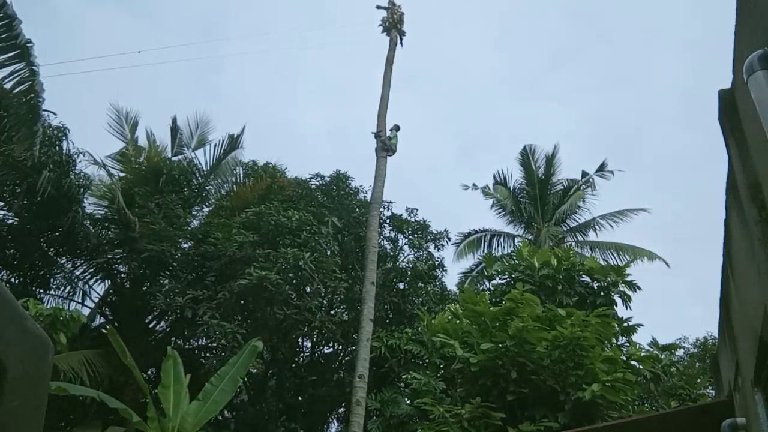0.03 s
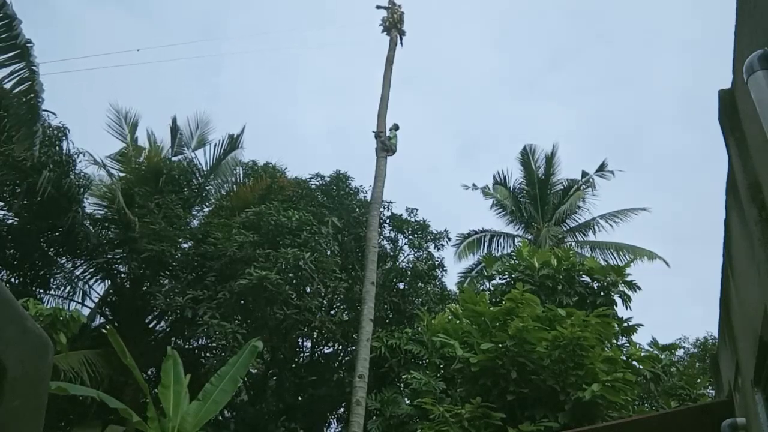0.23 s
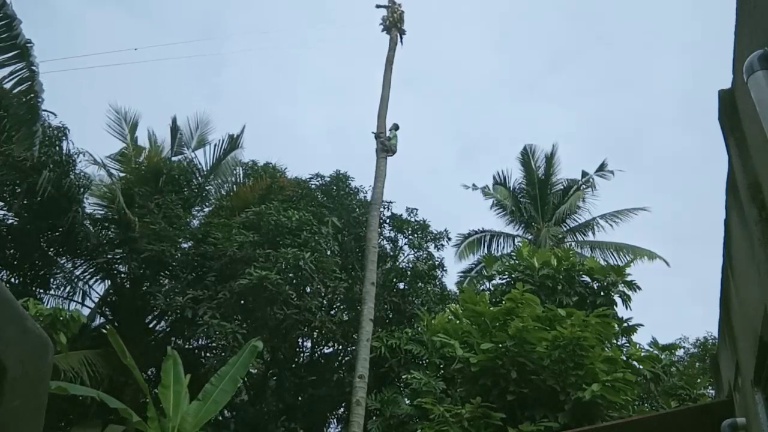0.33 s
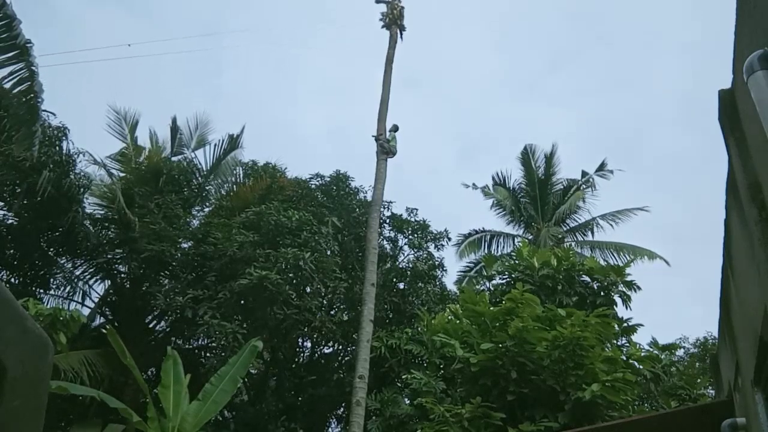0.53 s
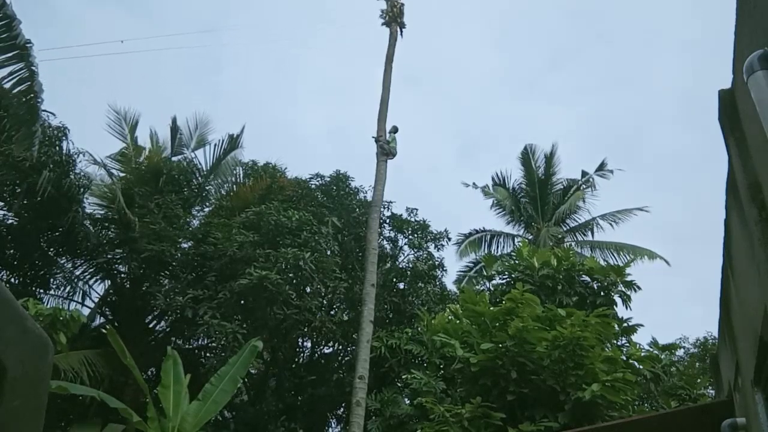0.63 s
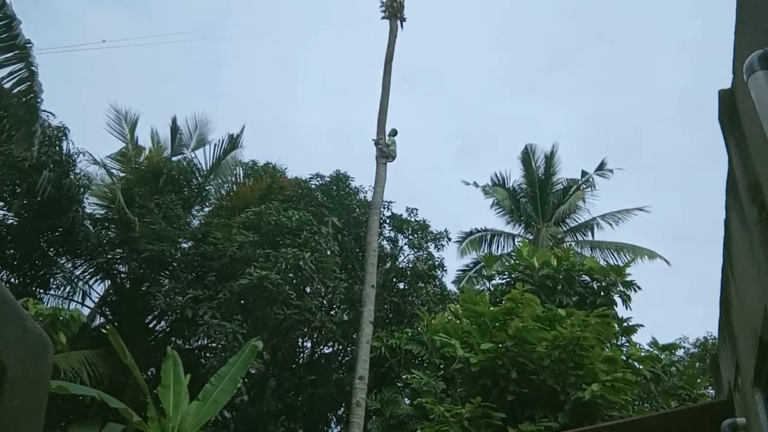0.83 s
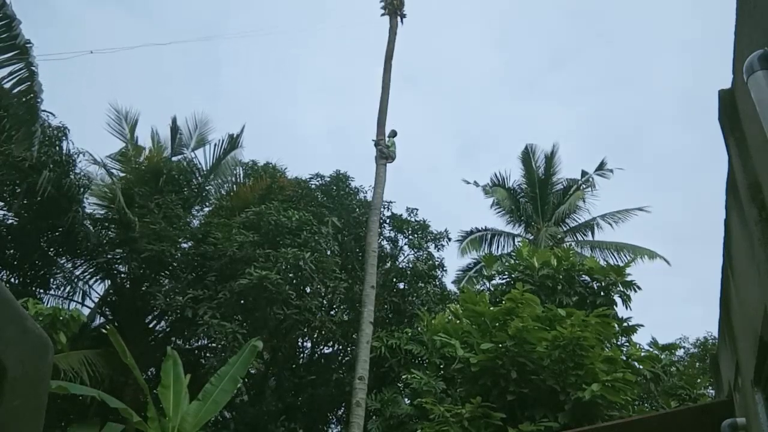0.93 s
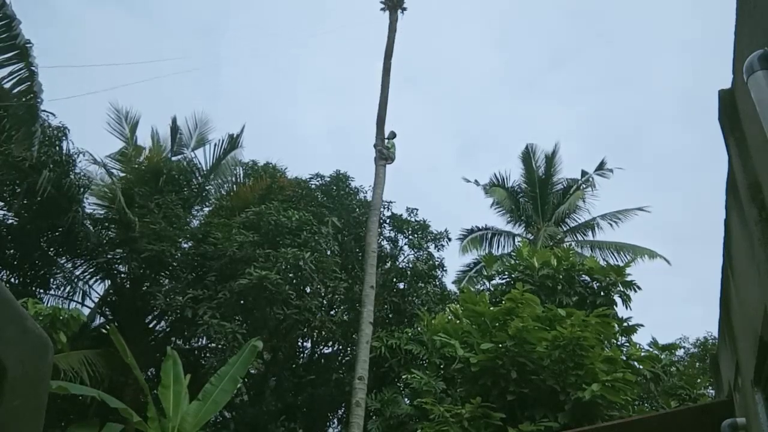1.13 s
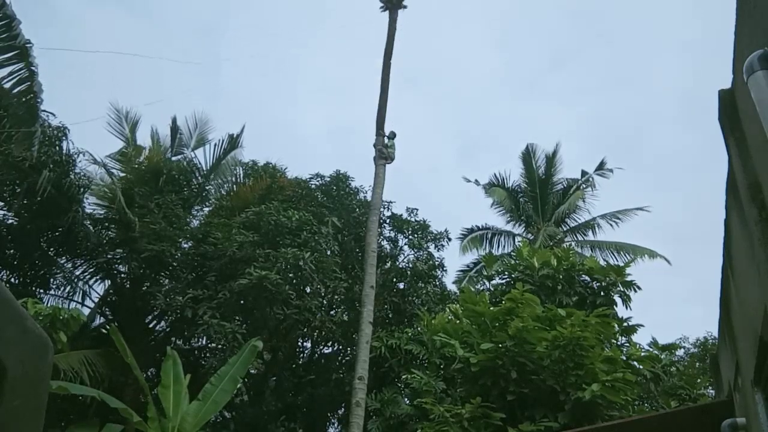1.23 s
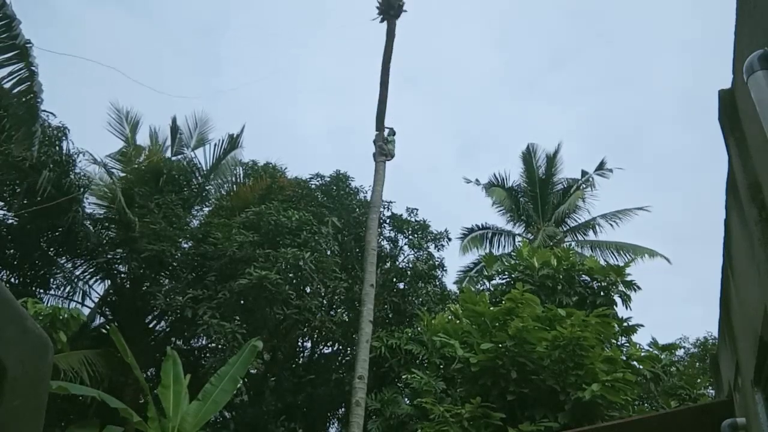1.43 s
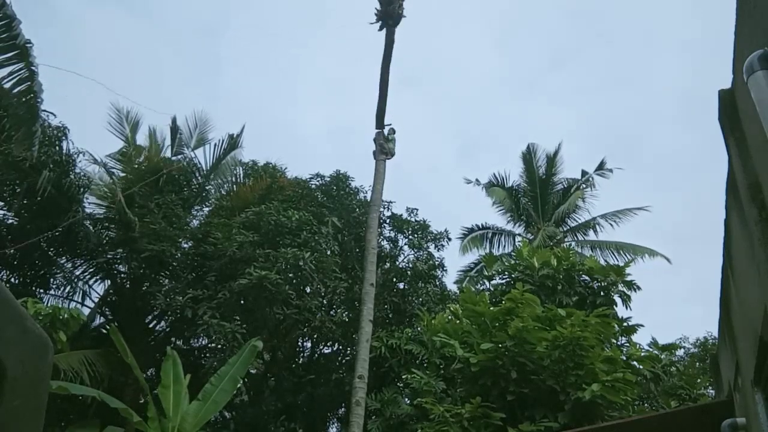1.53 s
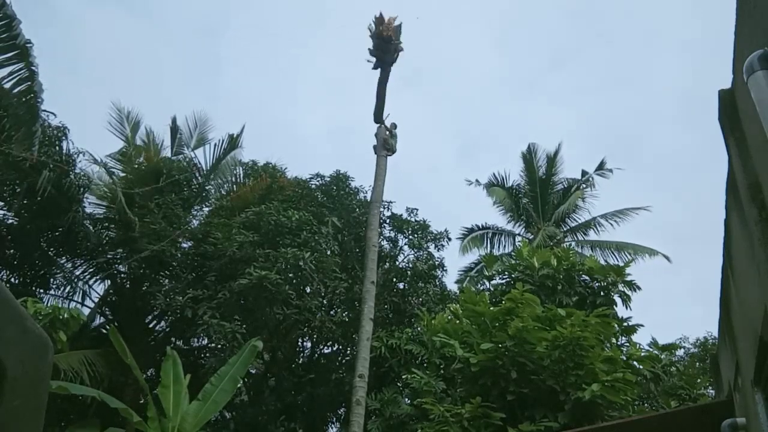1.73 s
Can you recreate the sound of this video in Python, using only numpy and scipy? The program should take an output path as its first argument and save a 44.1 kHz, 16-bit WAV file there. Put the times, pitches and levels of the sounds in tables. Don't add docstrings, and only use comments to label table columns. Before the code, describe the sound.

A palm tree top snaps with a sharp wooden crack, then splinters and rustling fronds trail off

```python
import sys
import numpy as np
from scipy import signal
from scipy.fft import rfft, irfft
from scipy.io import wavfile
from scipy.ndimage import uniform_filter1d

SR = 44100
rng = np.random.default_rng(int(sys.argv[2]) if len(sys.argv) > 2 else 0)


def generate_wav(sig):
    pcm = np.round(np.clip(np.atleast_2d(sig).T, -1, 1) * 32767).astype(np.int16)
    wavfile.write(sys.argv[1], SR, pcm)


def voltage_ratio(decibels):
    exponent = np.asarray(decibels, float) / 20
    return 10 ** exponent


N = 79380
T = np.arange(N) / SR


def unit(x):
    return x / np.sqrt(np.mean(x ** 2))


def curve(table, order=1):
    return np.interp(T, np.array(table)[:, 0], np.array(table)[:, order])


def colour(x, points):
    log_hz = np.log(np.maximum(np.arange(N // 2 + 1) * SR / N, 1))
    p = np.array(points)
    at = np.log(p[:, 0])
    outside = np.maximum(at[0] - log_hz, 0) + np.maximum(log_hz - at[-1], 0)
    gain = voltage_ratio(np.interp(log_hz, at, p[:, 1]) - 37 * outside)
    return unit(irfft(rfft(x) * gain, N))


def ring(x, peaks, order=1):
    out = 0
    for k, (hz, width, db) in enumerate(peaks):
        y = x
        for _ in range(order):
            y = signal.lfilter(*signal.iirpeak(hz, hz / width, SR), y)
        out = out + (-1) ** k * voltage_ratio(db) * y
    return out


def walk(rate):
    k = int(SR / rate)
    held = np.repeat(rng.standard_normal(N // k + 1), k)
    return 1.5 * uniform_filter1d(uniform_filter1d(held, k), k)[:N]


def burst(start, length):
    rise_s = 0.0003
    t = np.maximum(T - start, 0)
    return (1 - np.exp(-t / rise_s)) * np.exp(-t / max(length, rise_s))


def bursts(events):
    return sum(voltage_ratio(db) * burst(s, n) for s, db, n in events)


def grains(rate, spread_db):
    bits = (rng.random(N) < rate / SR) * voltage_ratio(spread_db * rng.exponential(size=N))
    return unit(rng.standard_normal(N) * (1.8 + signal.lfilter([1], [1, -.95], bits)))


def modes(events):
    waver_rad, waver_db, waver_hz = 0.7, 1.2, 500
    out = 0
    for s, db, hz, n in events:
        waver = min(hz / waver_hz, 1)
        pace = min(hz / 2, waver_hz)
        tone = np.sin(2 * np.pi * hz * (T - s) + waver_rad * waver * walk(pace))
        swell = np.clip((T - s) * hz, 0, 1)
        out = out + voltage_ratio(db + waver_db * waver * walk(pace)) * tone * burst(s, n) * swell
    return out


def cracks():
    # (time [s], peak [dB], treble share [dB], length [s])
    breaks = [(.2100, -1.5, 2, 0.0022), (0.2119, -2, -9, 0.0017), (0.225, -10.5, -4, 0.0017),
              (0.23, -18, -12, 0.0017), (0.244, -20, -9, 0.0034), (0.245, -16, -10, 0.0018),
              (0.347, -14.5, 10, 0.002), (0.349, -14, -14, 0.0086), (0.3567, -19, 13.5, 0.0026),
              (0.362, -22, -20, 0.0051), (0.37, -23, -19, 0.0031), (0.414, -22.5, 4, 0.0042),
              (0.419, -18, 2, 0.0041), (0.439, -22.5, -4, 0.0039), (0.469, -32, -16, 0.0031),
              (0.4933, -21.5, 0.5, 0.0073), (0.519, -28.5, -12, 0.0086), (0.588, -32.5, 4.5, 0.0066),
              (0.795, -33.5, 2.5, 0.007), (1.008, -37, -16, 0.008), (1.235, -41, -15, .004),
              (1.27, -37, -20, 0.0045), (1.402, -33.5, -14.5, 0.00296)]
    # (time [s], peak [dB], length [s])
    ribs = [(0.306, -27, 0.0033), (0.391, -35, 0.0023), (0.44, -28, .003), (0.47, -23, 0.001),
            (0.519, -29, 0.005), (.545, -26, .002), (0.574, -32, .002), (0.61, -30, .002),
            (0.629, -24.5, .002), (0.637, -24.5, .002), (0.674, -30, 0.0025), (0.711, -34, .002),
            (0.757, -27, .002), (0.801, -37, 0.0022), (0.819, -29, .003), (.859, -31, 0.0022),
            (.9039, -29, 0.0022), (0.959, -32, 0.0034), (0.981, -33, .002), (1.007, -46, 0.0016)]
    # (frequency [Hz], width [Hz], level [dB])
    wood = [(827, 270, -5.5), (1240, 314, 1), (2130, 660, -6.5), (2750, 640, -11.5), (3380, 1400, -11)]
    # (frequency [Hz], width [Hz], level [dB])
    snap_peaks = [(6350, 1260, -3.5), (7740, 520, 0.5), (8900, 490, -12.5), (3700, 730, -14),
                  (13400, 2600, -42)]
    body_noise, snap_noise = np.sign(rng.standard_normal((2, N)))
    body = bursts([(s, db, n) for s, db, _, n in breaks])
    snap = bursts([(s, db + treble, 0.5 * n) for s, db, treble, n in breaks]) + bursts(ribs)
    body_sound = voltage_ratio(12) * ring(body_noise * body, wood, order=2)
    return body_sound + voltage_ratio(10.5) * ring(snap_noise * snap, snap_peaks, order=2)


def thuds():
    # (time [s], peak [dB], pitch [Hz], length [s])
    blows = [(.201, -21, 484, 0.0089), (0.203, -23, 1064, 0.017), (0.205, -26, 2020, 0.0087),
             (.2105, -7, 2714, 0.0038), (.2085, -13, 429, 0.0092), (.222, -15, 497.5, 0.013),
             (0.213, -21, 735.3, 0.021), (.211, -24, 270, 0.0088), (.212, -18, 362.6, 0.012),
             (0.213, -24.5, 132, 0.016), (.215, -18.5, 88, 0.013), (.228, -21.5, 191.6, 0.022),
             (.243, -23.5, 94.6, 0.036), (.244, -21, 410.6, 0.0125), (0.348, -14.5, 2130, 0.0045),
             (0.37, -24, 201, 0.0097), (0.417, -16, 2130, 0.0036), (0.828, -32.5, 540, 0.0066),
             (0.829, -34.5, 772, 0.0061), (1.195, -39, 716, 0.005), (1.207, -30, 1010, 0.0026),
             (1.216, -38, 740.4, 0.0092), (1.523, -37.5, 407, 0.0101), (1.748, -36.5, 481, 0.011)]
    return modes(blows)


def more_modes():
    # (time [s], peak [dB], pitch [Hz], length [s])
    pings = [(.2132, -1.5, 1173, 0.0031), (0.2136, -14, 2150, .002), (0.2213, -22, 1350, 0.0018),
             (.2235, -11.5, 1187, 0.0042), (.2265, -14, 2220, 0.0038), (0.2367, -16, 990, 0.0038),
             (0.251, -11, 851, 0.0017), (.2515, -15, 1440, 0.0023), (0.268, -26.5, 3280, .003),
             (.3508, -16, 1190, 0.0048), (0.3569, -16, 1300, 0.0016), (0.3637, -24, 2260, 0.0047),
             (0.42, -20, 1303, 0.0027), (.436, -28, 2230, 0.0055), (.472, -27, 2080, 0.0049),
             (0.492, -26, 3200, 0.0028), (0.521, -28, 1330, 0.013), (.588, -28, 1193, 0.0054),
             (0.608, -25.5, 1025, 0.0039), (0.642, -36, 2770, 0.0033), (.796, -33.5, 2840, .006),
             (0.956, -41, 3140, 0.036), (1.017, -38.5, 3280, 0.015), (1.018, -29.5, 1310, 0.0036),
             (1.4447, -23.5, 2754, 0.0043), (1.4455, -25.5, 1357, 0.0075), (1.45, -28, 855, .004)]
    return modes(pings)


def late_knock():
    # (time [s], peak [dB], length [s])
    strikes = [
        (1.4443, -20, 0.0032),
        (1.4481, -21.5, 0.0032),
        (1.4508, -27.5, 0.0045),
        (1.461, -32, .003),
        (1.467, -32, 0.0045),
        (1.489, -41, 0.0045),
        (1.51, -39, 0.0042),
        (1.526, -40, .008),
    ]
    # (frequency [Hz], width [Hz], level [dB])
    piece = [(815, 290, 0), (1274, 500, -0.5), (2150, 390, 0.5), (2740, 530, 2.5), (7400, 1300, -11.5),
             (14200, 3300, -33)]
    noise = np.sign(rng.standard_normal(N))
    return voltage_ratio(10) * ring(noise * bursts(strikes), piece, order=2)


def ticks():
    # (time [s], peak [dB], length [s])
    twigs = [
        (0.0508, -31.5, 0.0089),
        (1.159, -31, 0.0087),
        (1.171, -43.5, 0.04),
        (1.228, -43, 0.0051),
        (1.3899, -30.5, 0.0098),
        (1.397, -44, 0.0036),
        (1.662, -38, .005),
        (1.7514, -43, .006),
        (1.6008, -36, 0.0093),
    ]
    # (frequency [Hz], width [Hz], level [dB])
    twig_peaks = [(3470, 840, -0.5), (6540, 2160, -1), (8470, 1950, -3), (14600, 2200, -16)]
    return voltage_ratio(2) * ring(rng.standard_normal(N) * bursts(twigs), twig_peaks)


def debris():
    # (frequency [Hz], density [dB per Hz])
    debris_colour = [(59, -27), (100, -2.5), (289, -3.5), (467, 1), (866, -3.5), (1220, 1), (3080, -7.5),
                     (4560, -24.5), (6000, -16.5), (7800, -53), (13200, -120)]
    start_s, t60_s = 0.214, 0.52
    fall = voltage_ratio(-18 + 0.5 * walk(75.6)) * burst(start_s, t60_s / np.log(1000))
    return fall * colour(grains(2500, 1.2), debris_colour)


def fronds():
    # (time [s], level [dB])
    brush_level = [(.21, -29), (.33, -41), (.37, -31.5), (.5, -35.5), (.84, -40), (.92, -43.5),
                   (.96, -41.5), (1.03, -41.5), (1.06, -53), (1.38, -77), (1.4, -45.5), (1.54, -46),
                   (1.64, -52.5), (1.73, -56.5), (1.76, -48.5), (1.8, -49)]
    # (frequency [Hz], density [dB per Hz])
    frond_colour = [(240, -12), (400, -2.5), (708, -8), (922, -3), (1770, -8), (2150, -4), (2410, -10.5),
                    (2830, -4.5), (5000, -19), (6500, -63), (11000, -120)]
    # (frequency [Hz], density [dB per Hz])
    tip_colour = [(2650, -46), (4500, -56), (4980, -13.5), (6290, -7), (7650, -1.5), (8920, -9.5),
                  (9770, -19.5), (14500, -21), (16000, -27)]
    level_db = np.where(T < brush_level[0][0], -90, curve(brush_level))
    brush = voltage_ratio(level_db + 0.33 * walk(40.635))
    leaves = colour(grains(3000, 1.5), frond_colour)
    clumps = 0
    for hz in 450 * 1.7 ** np.arange(7):
        clumps = clumps + voltage_ratio(4 * walk(43.28)) * ring(leaves, [(hz, hz, 0)])
    low = unit(clumps) * voltage_ratio(-1.5 * (T - 0.15) * (T < 1.1))
    tips = voltage_ratio(-4 + walk(89.2)) * colour(grains(860, 1.17), tip_colour)
    return brush * (low + tips)


def engine():
    # (time [s], firing rate [Hz], level [dB])
    idle = [
        (0, 22.6, -39.5),
        (.5, 22.67, -41),
        (1.0, 22.37, -39.5),
        (1.4, 22.34, -44),
        (1.8, 22.32, -46.5),
    ]
    # (multiple of firing rate, first level [dB], middle level [dB], last level [dB])
    harmonics = [(3, -11, -10.5, -16.5), (4, -4, -3.5, 3.5), (5, 3.5, -4, -3.5), (6, 4.5, -2.5, -6),
                 (7, -20, -8.5, -2.5), (8, -13, -6.5, -20), (9, -12.5, -9.5, -22), (11.5, -9, -11, -8.5),
                 (15.5, -18, -32, -15)]
    wander_db, wobble_rad = 1.4, 0.8
    turn = 2 * np.pi * np.cumsum(curve(idle)) / SR
    hum = 0
    for k, *db in harmonics:
        level_db = np.interp(T, [0, T[-1] / 2, T[-1]], db) + wander_db * walk(13.85)
        phase = k * turn + 7 * rng.random() + wobble_rad * walk(11)
        hum = hum + voltage_ratio(level_db) * np.sin(phase)
    return voltage_ratio(curve(idle, order=2)) * hum


def garden():
    # (frequency [Hz], density [dB per Hz])
    rumble_colour = [(24, -56), (40, -15.5), (140, -8.5), (470, -21.5), (587, -24.5), (1520, -25),
                     (1650, -26), (3140, -27), (5000, -40.5), (6500, -78), (11000, -120)]
    # (frequency [Hz], density [dB per Hz])
    hiss_colour = [(2650, -28), (4500, -17), (5140, 0), (5330, -4), (6390, -3.5), (7690, 0.5), (11200, -17),
                   (15200, -11), (16000, -20)]
    low, high = rng.standard_normal((2, N))
    rumble = voltage_ratio(-44.5 + walk(6.8)) * colour(low, rumble_colour)
    return rumble + voltage_ratio(-58.5 + 0.8 * walk(7.1)) * colour(high, hiss_colour)


def scattered(hits):
    t60_s, first_return_s = 0.55, 0.006
    t = T[:SR // 2]
    scatter = rng.standard_normal(len(t)) * voltage_ratio(-60 * t / t60_s) * (t > first_return_s)
    return signal.fftconvolve(hits, scatter / np.sqrt(np.sum(scatter ** 2)))[:N]


def scene():
    hits = cracks() + late_knock() + ticks()
    duck_s, duck_db, attack_s, recover_s = 0.181, -7.5, 0.005, 0.23
    since = np.maximum(T - duck_s, 0)
    duck = voltage_ratio(duck_db * np.clip(since / attack_s, 0, 1) * np.exp(-since / recover_s))
    palm = hits + voltage_ratio(-12) * scattered(hits) + thuds() + more_modes() + debris() + fronds()
    background = duck ** 0.4 * engine() + duck * garden()
    return (palm + background)[None]


def roll_off(x):
    return signal.sosfilt(signal.butter(12, 16470, fs=SR, output="sos"), x)


def record(dry):
    bass_cut_hz, top_hz, ceiling = 55, 15650, 1.15
    bass_cut = signal.butter(N=2, Wn=bass_cut_hz, btype="high", fs=SR, output="sos")
    top_cut = signal.ellip(8, .2, 30, top_hz, fs=SR, output="sos")
    thin = signal.sosfilt(bass_cut, dry)
    rounded = ceiling * np.tanh(thin / ceiling)
    return roll_off(signal.sosfilt(top_cut, rounded))


dry = scene()
out = record(dry)
generate_wav(out)
```